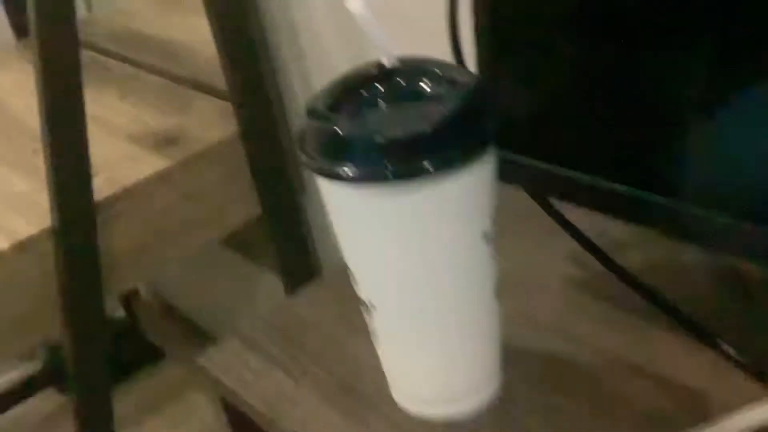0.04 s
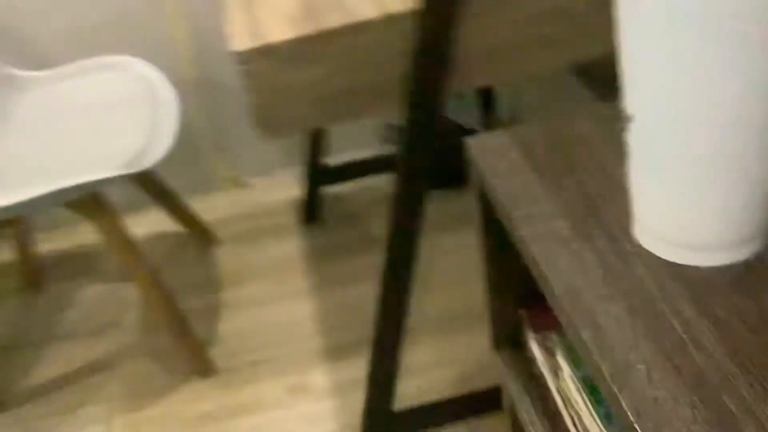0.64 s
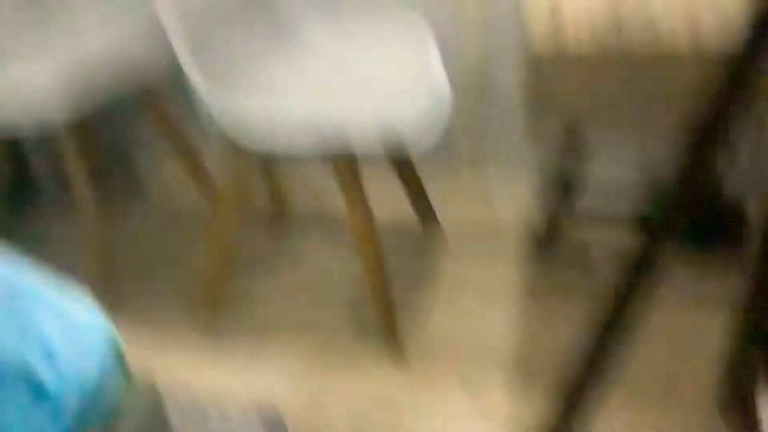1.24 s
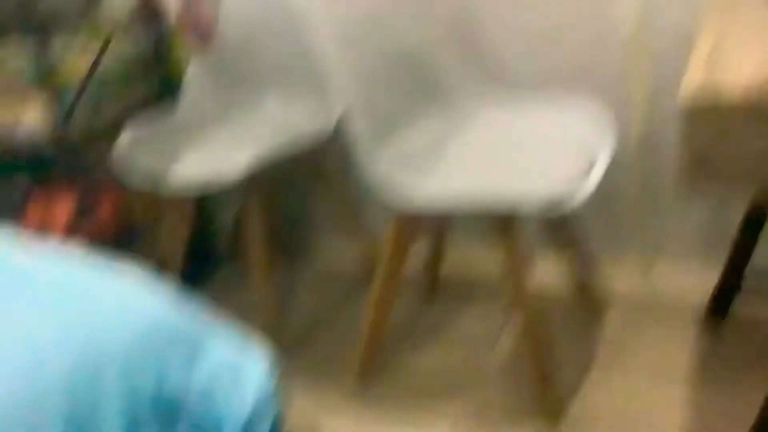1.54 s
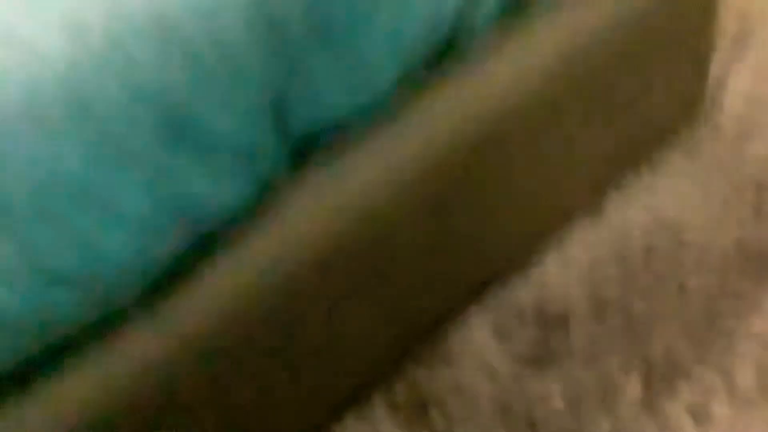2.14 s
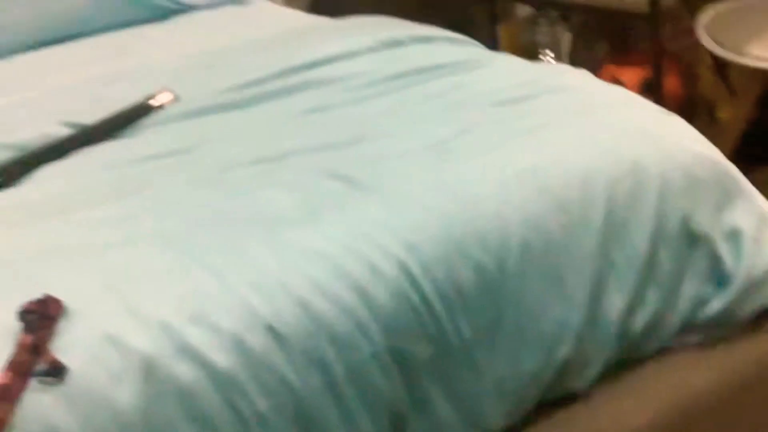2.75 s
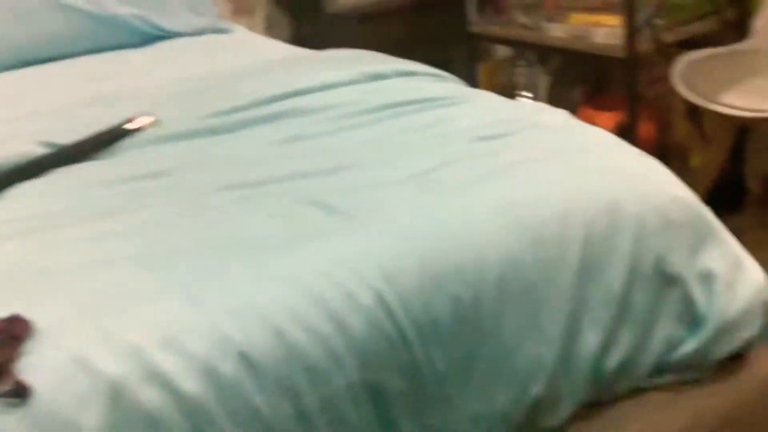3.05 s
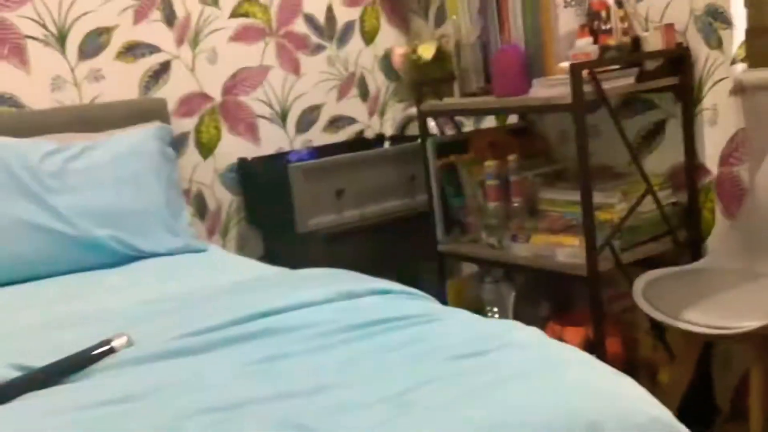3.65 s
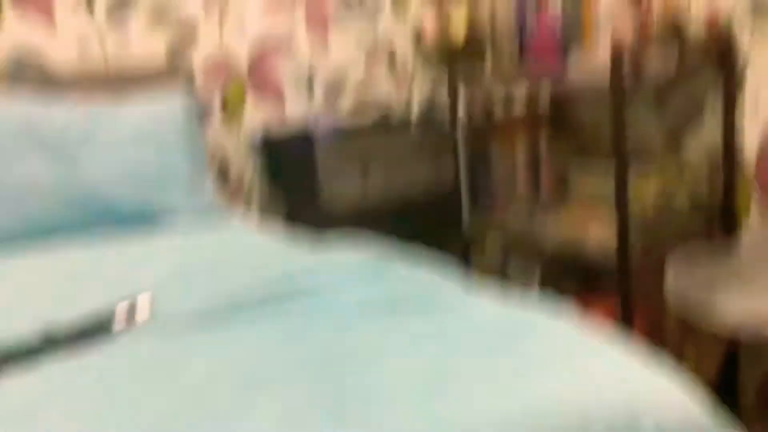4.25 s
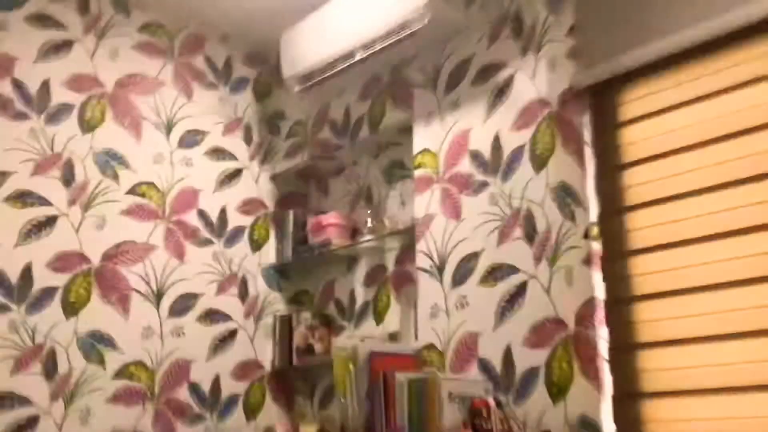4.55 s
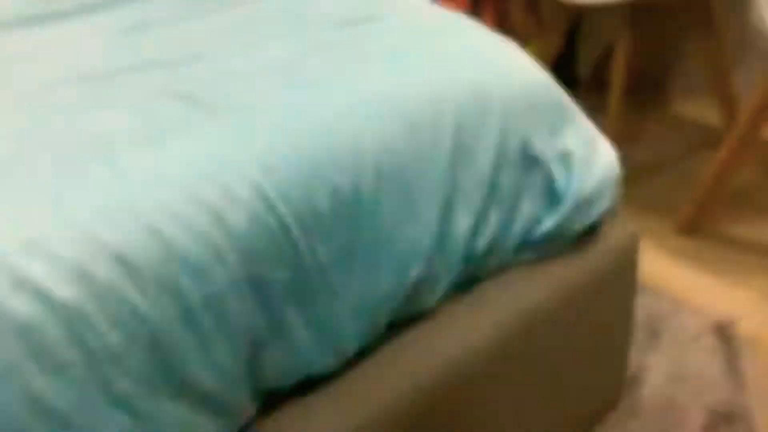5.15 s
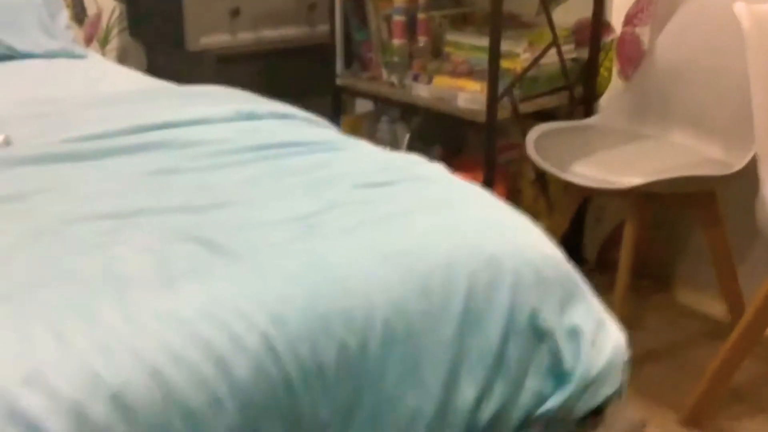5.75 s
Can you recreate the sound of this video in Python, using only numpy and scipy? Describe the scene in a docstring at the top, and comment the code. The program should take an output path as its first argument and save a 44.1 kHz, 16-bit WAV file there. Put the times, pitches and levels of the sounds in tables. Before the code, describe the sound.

Fingers tap, thump and rub on a phone right at its microphone as it is carried around a small, quiet bedroom.

```python
"""Fingers tap, knock and shift on a phone's case, heard from right on top of its own microphone
as it is carried and swung about a small, quiet bedroom. Each contact is a click that falls into a
thump, as the bass travels late through the case; a few free blows leave it ringing.
Between contacts the hand slides in swelling strokes, and the skin squeaks now and then.
Farther off, the furnished room answers the knocks faintly."""
import sys
import numpy as np
from scipy import signal
from scipy.fft import rfft, irfft, next_fast_len
from scipy.io import wavfile
from scipy.ndimage import uniform_filter1d, map_coordinates

SR = 44100
rng = np.random.default_rng(int(sys.argv[2]) if len(sys.argv) > 2 else 0)


def transcribe(signal):
    """Save signal, clipped to [-1, 1], as a 16-bit WAV file at the path in sys.argv[1]."""
    frames = np.atleast_2d(signal).T
    limited = np.clip(frames, -1, 1)
    pcm = np.round(limited * 32767).astype(np.int16)
    wavfile.write(sys.argv[1], SR, pcm)


N = 260569

# The bedroom's decay. Each row: frequency in Hz, seconds to fall 60 dB.
ROOM_DECAY = [(100, 0.18), (400, 0.23), (2200, 0.29), (6000, 0.3), (15000, 0.069)]
# Colours of the room's answer and of the chafing case. Each row: frequency in Hz, gain in dB.
ROOM_COLOUR = [(100, -11.5), (400, -11.5), (2200, -19.0), (5000, -17.5), (15000, -15.0)]
CHAFE_COLOUR = [(2500, -20.0), (5000, 13.5), (15000, -8.5)]
# Colours of the rubbing, and of the case under a contact. Each row: frequency in Hz, gain in dB.
RUMBLE_COLOUR = [(20, -67.5), (45, -19.5), (85, -1.5), (130, -3.5), (280, -5.5), (550, -9), (800, -15.5),
                 (1500, -53.5)]
SCRAPE_COLOUR = [(300, -41), (520, -3.5), (700, -3.5), (1100, -6), (1800, -6.5), (2200, -12.5),
                 (3200, -63.5)]
HISS_COLOUR = [(3000, -10), (4300, 3), (5200, -0.5), (6500, -9), (8000, -2), (16000, -3.5)]
CASE_COLOUR = [(20, -53.5), (38, -39), (55, -8), (75, 0.5), (260, 0), (1600, -1.5), (2200, 2), (2800, 2),
               (4000, 0), (7000, -4), (8400, 0), (10300, -5.5), (12200, -3), (16000, -7)]
# Each hold of the hand tunes the case. Each row: start in seconds, rasp centre, rasp width, upper edge
# and hiss peak in Hz, then gains of the hiss peak, the top hiss and the contacts' tick in dB.
GRIPS = [(0, 2385, 324, 3960, 8950, 1.5, -32.5, 4.5), (.52, 2440, 610, 4940, 9200, 0, -9.5, 1.5),
         (1.0, 2260, 560, 3800, 8700, -1, -0.5, -7.5), (1.3, 2200, 925, 4450, 8640, 6.5, 0, -4.5),
         (1.95, 2500, 1110, 3570, 7740, -8, -9.5, -3), (2.28, 2300, 880, 3940, 11200, -31, -4, 2.5),
         (3.05, 3000, 1500, 3420, 9000, -19, -12.5, 2), (3.6, 3100, 940, 4050, 8340, -25, -9, 13),
         (4.25, 2300, 900, 3320, 6850, 0.5, -3, -4.5), (4.54, 2300, 450, 2480, 6500, -9, -1, 1.5)]
# Short pitched sounds: three skin squeaks, then one brief low knock on the case.
# Each row: start and length in seconds, first and last pitch in Hz, level in dB.
PITCHED_SOUNDS = [(1.968, 0.041, 235, 630, -32.5), (2.129, 0.034, 263, 340, -34),
                  (4.375, 0.025, 485, 440, -23.5), (4.58, 0.0086, 412, 355, -12)]
# Slides of the hand. Each row: start and length in seconds, rasp level in dB, then rumble, scrape
# and hiss in dB relative to the rasp, all ahead of the trims in rubbing().
STROKES = [(0.175, 0.1, -37.5, -12, -3.5, -27), (0.407, 0.082, -36, -20, -8.5, -27),
           (0.542, 0.23, -50.5, -13, -3.5, -9.5), (0.99, 0.15, -47, 1, -3, -7),
           (1.225, 0.19, -43, 4, -5, -17), (1.463, 0.2, -35.5, -4.5, -13.5, -17.5),
           (1.63, 0.22, -40, -0.5, -6.5, -20.5), (1.955, 0.18, -40.5, -1, -17, -9.5),
           (2.113, 0.11, -36, -9, -4, -23.5), (2.261, 0.44, -55, -22, -25, -2),
           (2.986, 0.05, -61, 10, 3, 10), (3.127, 0.24, -43, 5.5, 3.5, -12),
           (3.487, 0.09, -50, 6.5, -11, -10.5), (3.662, 0.13, -52, 5.5, -2, -7.5),
           (3.813, 0.14, -42, -12, -5.5, -11), (4.291, 0.12, -47.5, 11.5, 1, 4.5),
           (4.374, 0.12, -43, 12, 6.5, 2.5), (4.759, 0.094, -47.5, 5, 3, -13),
           (5.044, 0.19, -50, 16.5, 8, -0.5), (5.252, 0.17, -51, 8, 5, 0.5),
           (5.796, 0.18, -59, -3, 4.5, 1.5)]
# Fine hiss under the resting hand. Each row: time in seconds, relative level in dB.
CREEP_HISS = [(0.0, -58), (0.31, -68), (1.61, -58), (2.5, -59.5), (2.78, -94), (3.78, -58.5), (4.08, -69.5),
              (4.32, -82), (4.42, -54), (4.85, -70), (5.26, -59), (5.49, -84), (5.73, -82.5), (5.9, -71)]
# Resonances of the case. Each row: frequency in Hz, gain in dB, seconds to fall 60 dB.
CASE_MODES = [(116, -9, 0.17), (274.6, -3.5, 0.19), (304, 1.5, 0.082), (385, -9, 0.12), (2213, 7.5, 0.013),
              (3570, -17, 0.016)]
# Blows that set the case ringing. Each row: start in seconds, drive of low and of high modes in dB.
FREE_BLOWS = [(1.068, -25.5, 0), (1.084, -18, -40), (1.242, -24.5, -12), (3.123, -32.5, -37),
              (3.512, -24, -53)]
# Registers of a contact in Hz: thump, knock, clack, tap, tick, fizz.
REGISTERS_HZ = [105, 340, 950, 2150, 5000, 11500]
# Fingers on the case. Each row: start in seconds, scuff length in ms, then strength, weight, hardness
# and fizz in dB. Weight (the thump) and fizz are relative to strength; hardness tips clack towards tap.
CONTACTS = [(0.0311, 3, 8.5, -5, -2.5, -31.5), (0.073, 5.7, 6.5, -11, 0, -28.5),
            (0.351, 3.5, 0, -11, 2, -30.5), (0.521, 7.3, -1.5, -25, -0.5, -22),
            (0.549, 4.3, -1, -22, -1.5, -33), (0.663, 4.5, 0.5, -12, 0, -31.5),
            (0.773, 5.7, -4, -8, -1.5, -43), (0.885, 8.5, 0.5, 13.5, 1.5, -21.5),
            (0.983, 2.1, 0, 14.5, -1.5, -45), (1.0661, 7.9, 21, 13.5, -1.5, -25.5),
            (1.087, 7.6, 4.5, 8.5, -5, -8.5), (1.133, 7.1, 1.5, 20, -7, -23),
            (1.2374, 4.05, 21.5, -1, 2, -33.5), (1.31, 6, -6.5, 8.5, 6, -1.5),
            (1.3324, 5.3, 11, 21.5, -9, -15), (1.343, 7.1, 0.5, 25, 10.5, 3.5),
            (1.353, 2.5, 2, 23.5, -3.5, -23.5), (1.391, 3.5, 7, 9, 7.5, -28.5),
            (1.587, 3.2, 10.5, 23.5, 7, -19), (1.607, 39, 2.5, 25, 0.5, -35), (1.63, 13, -8, 34.5, -5, -29),
            (1.7677, 6.7, 18, 8.5, 0.5, -20), (1.922, 4.1, 7, 12, -3, -19), (2.059, 6.8, 3.5, 11, 2, -37),
            (2.1095, 4.2, 15.5, 1.5, 2, -36.5), (2.287, 6.4, 24, 11, -1, -25),
            (2.578, 8, -11.5, 9, 1.5, -17), (2.799, 7.2, -6, -1, 0.5, -35),
            (3.1232, 0.92, 7.5, 7.5, 3, -49), (3.183, 4.9, 11.5, -2, -6, -33),
            (3.5115, 3.3, 5.5, 16.5, -2.5, -35), (3.617, 3.8, -9.5, 15, -8.5, -26),
            (4.243, 7, -13, 5, 5.5, -10.5), (4.396, 10.3, 11, 12, -3.5, -38.5),
            (4.412, 6.7, 4, 26.5, 4, -27), (4.448, 11, 9.5, 21.5, -3.5, -6.5),
            (4.513, 3.9, -7, 22, -3, -13), (4.5647, 2.5, 25.5, 3, -2, -41), (4.5825, 6, 11, 19, -6, -14),
            (4.776, 21, 9, 1, -7.5, -33), (4.795, 7.7, 8.5, -9, 1, -34), (4.858, 9.2, 5, -14, 0, -30),
            (4.91, 9.2, -2, 2, 6.5, -23), (5.019, 6.5, 9, 4, 2.5, -26.5), (5.036, 5.7, 20, 8, 1.5, -16.5),
            (5.071, 12, 14, 3, 1, -15.5), (5.1045, 7, 26, 9, -5, -23), (5.113, 6.5, 30, -1.5, -2.5, -40.5),
            (5.1891, 2.6, 3, -4, -1.5, 9.5), (5.298, 5.4, 0, 17, -2, 0.5), (5.346, 7.8, 20, 23, 2.5, -18),
            (5.352, 15.6, 9, 35, 4, -6), (5.364, 6.4, 12.5, 9.5, -0.5, -10), (5.867, 7.2, -6, 15, -3.5, -9)]


def amp(db):
    """Decibels to gain."""
    return 10 ** (np.asarray(db) / 20)


def unit(x):
    """Scale to rms 1."""
    return x / np.sqrt(np.mean(x ** 2) + 1e-20)


def along(points, hz):
    """Read (Hz, value) points on a log axis."""
    frequencies, values = np.transpose(points)
    return np.interp(np.log(hz + 1), np.log(frequencies + 1), values)


def wobble(per_s):
    """A smooth random curve with per_s knots a second."""
    knots = rng.standard_normal(int(N * per_s / SR) + 4)
    return map_coordinates(knots, [np.arange(N) * per_s / SR])


def filtered(x, response):
    """Pass x through a complex response, given as a function of Hz."""
    size = next_fast_len(N + SR // 2)
    return irfft(rfft(x, size) * response(np.fft.rfftfreq(size, 1 / SR)), size)[:N]


def coloured(x, colour):
    """Shape x by a curve of (Hz, dB) points."""
    return filtered(x, lambda hz: amp(along(colour, hz)))


def causal(gain):
    """The minimum-phase response that has this gain."""
    cepstrum = irfft(np.log(np.maximum(gain, 1e-6)))
    half = len(cepstrum) // 2
    cepstrum[1:half] *= 2
    cepstrum[half + 1:] = 0
    return np.exp(rfft(cepstrum))


def add(track, start_s, sound):
    """Mix a sound in at start_s."""
    start = max(0, round(start_s * SR))
    track[start:start + len(sound)] += sound[:max(0, N - start)]


def ripple(hz, depth_db, step_hz):
    """The many weak, close modes of hand and case: a random unevenness of gain."""
    return amp(depth_db * map_coordinates(rng.standard_normal(1024), [hz / step_hz], mode="mirror"))


def bedroom(knocks, delay_s):
    """The furnished room sends a short, soft tail back to the microphone, weak in the treble."""
    hz, t, noise = signal.stft(rng.standard_normal(SR // 2), SR, nperseg=256)
    decay = amp(-60 * t / along(ROOM_DECAY, hz)[:, None])
    tail = signal.istft(noise * decay, SR, nperseg=256)[1]
    tail = np.pad(tail / np.linalg.norm(tail), (round(delay_s * SR), 0))
    return coloured(signal.fftconvolve(knocks, tail)[:N], ROOM_COLOUR)


def chafing(handling, gain_db, below_hz):
    """The deepest thumps make the case buzz against the hand at each swing."""
    swing = filtered(handling, lambda hz: 1 / (1 + (hz / below_hz) ** 4))
    chafe = unit(coloured(rng.standard_normal(N), CHAFE_COLOUR))
    return amp(gain_db) * swing ** 2 * chafe


def squeaks_and_knock(jitter=0.04, overtone_db=-15):
    """Short gliding tones: three are skin slipping at a near-regular rate, the briefest a low knock."""
    track = np.zeros(N)
    for start_s, length_s, first_hz, last_hz, db in PITCHED_SOUNDS:
        age = np.linspace(0, 1, int(length_s * SR))
        glide_hz = first_hz * (last_hz / first_hz) ** age
        pitch_hz = glide_hz * (1 + jitter * wobble(per_s=220)[:len(age)])
        phase = 2 * np.pi * np.cumsum(pitch_hz) / SR
        tone = np.sin(phase) + amp(overtone_db) * np.sin(2 * phase)
        add(track, start_s, amp(db) * np.sin(np.pi * age) * tone)
    return track


def friction(grain_db, grains_per_s):
    """Skin catching and slipping: noise of rms 1 in short uneven grains."""
    return unit(rng.standard_normal(N) * amp(grain_db * wobble(grains_per_s)))


def gripped(slips, gain, ripple_db, step_hz, size=16384):
    """Each hold of the hand colours the slips anew, at about the same level."""
    hz, t = np.fft.rfftfreq(size, 1 / SR), np.arange(N) / SR
    hold = np.searchsorted([grip[0] for grip in GRIPS[1:]], t)
    track = np.zeros(N)
    for k, (_, *tuning) in enumerate(GRIPS):
        colour = gain(hz, *tuning) * ripple(hz, ripple_db, step_hz)
        response = irfft(causal(colour))[:size // 8]
        crossfade = uniform_filter1d((hold == k) * 1., size=600)
        track += crossfade * signal.oaconvolve(slips, response / np.linalg.norm(response))[:N]
    return track


def resonance(hz, centre_hz, width_hz):
    """Gain of one resonance, 1 at its centre."""
    return np.abs(hz * width_hz / (centre_hz ** 2 - hz ** 2 + 1j * hz * width_hz))


def scrape_gain(hz, *tuning):
    """The broad middle of a rub."""
    return amp(along(SCRAPE_COLOUR, hz))


def rasp_gain(hz, rasp_hz, width_hz, edge_hz, *treble):
    """One resonance of the case, falling away steeply above its edge and in the bass."""
    high_cut = 1 + (hz / edge_hz) ** 10
    low_cut = 1 + (1650 / (hz + 1)) ** 7
    return resonance(hz, rasp_hz, width_hz) / high_cut / low_cut


def hiss_gain(hz, rasp_hz, width_hz, edge_hz, peak_hz, peak_db, top_db, tick_db):
    """Fine hiss with one airy peak from the gap between hand and microphone port."""
    slope_db = along([(7000, 0.0012), (12000, top_db)], hz)
    peak = resonance(hz, peak_hz, 0.16 * peak_hz) ** 2
    return amp(along(HISS_COLOUR, hz) + slope_db) + amp(peak_db) * peak


def swished(hiss, delay_ms, sway, echo):
    """A reflection off the moving hand draws slowly sliding resonances through the hiss."""
    lag = delay_ms * SR / 1000 * np.exp(sway * wobble(per_s=2.5))
    return unit(hiss + echo * map_coordinates(hiss, [np.arange(N) - lag]))


def slide_levels(steepness=4.37, uneven_db=1.8, tremor_db=1.17, creep_db=(-48, -59.5, -61, -1.5)):
    """Rumble, scrape, rasp and hiss in dB: strokes swell and fade over the resting hand's creep."""
    t, power = np.arange(N) / SR, np.zeros((4, N))
    for start_s, length_s, rasp_db, rumble_db, scrape_db, hiss_db in STROKES:
        speed = 1 / (1 + np.abs(2 * (t - start_s) / length_s - 1) ** steepness)
        gains = amp(rasp_db + np.array([rumble_db, scrape_db, 0, hiss_db]))
        power += np.outer(gains ** 2, speed ** 2)
    sliding = np.sqrt(power) * amp(uneven_db * wobble(per_s=15))  # a slide's speed is never even
    resting = np.outer(amp(creep_db), amp(tremor_db * wobble(per_s=9)))
    resting[3] *= amp(np.interp(t, *np.transpose(CREEP_HISS)))
    return 20 * np.log10(np.hypot(sliding, resting))


def rubbing():
    """The hand slides right beside the microphone: it rumbles, scrapes, rasps and hisses."""
    rumble_db, scrape_db, rasp_db, hiss_db = slide_levels()
    rumble = unit(coloured(friction(grain_db=3.0, grains_per_s=71), RUMBLE_COLOUR))
    scrape = gripped(friction(grain_db=0.5, grains_per_s=110), scrape_gain, ripple_db=4.5, step_hz=136.6)
    rasp = gripped(friction(grain_db=2.5, grains_per_s=490), rasp_gain, ripple_db=0, step_hz=166)
    hiss = gripped(friction(grain_db=2.0, grains_per_s=310), hiss_gain, ripple_db=3, step_hz=614)
    hiss = swished(hiss, delay_ms=0.803, sway=0.22, echo=0.18)
    return (amp(rumble_db - 4.0) * rumble + amp(scrape_db - 3.0) * scrape
            + amp(rasp_db - 4.5) * rasp + amp(hiss_db - 2.0) * hiss)


def case_ringing(attack_s, detune):
    """The case rings on after a few free blows, a little retuned each time by the hand."""
    track, t = np.zeros(N), np.arange(SR // 4) / SR
    rise = (1 - np.exp(-t / attack_s)) ** 2
    for start_s, low_db, high_db in FREE_BLOWS:
        for hz, db, t60 in CASE_MODES:
            strength_db = db + along([(400, low_db), (2000, high_db)], hz) + rng.normal()
            swing = np.sin(2 * np.pi * hz * (1 + detune * rng.normal()) * t)
            add(track, start_s, amp(strength_db - 60 * t / t60) * swing * rise)
    return track


def through_case(x, cycles, corner_hz):
    """Slow bending waves: each frequency reaches the microphone about as many of its own cycles late."""
    return filtered(x, lambda hz: np.exp(-2j * np.pi * cycles * np.log1p(hz / corner_hz)))


def light_touches(count, scuff_ms=6.5, strength_db=-13.5, spread_db=3.5):
    """The fingers adjust their hold with soft touches at loose intervals: rows as in CONTACTS."""
    weight_db, hardness_db, fizz_db = 22, -2.5, -31.5
    return [((k + place) * N / SR / count, scuff_ms, strength_db + spread_db * (2 * force - 1),
             weight_db, hardness_db, fizz_db) for k, (place, force) in enumerate(rng.random((count, 2)))]


def contact_colour(start_s, strength_db, weight_db, hardness_db, fizz_db):
    """A heavy finger thumps and knocks, a hard one taps, dry skin ticks and fizzes: (Hz, dB) points."""
    _, _, _, edge_hz, *_, grip_tick_db = [grip for grip in GRIPS if grip[0] <= start_s][-1]
    knock_db = -1 + 0.46 * weight_db - 0.51 * hardness_db
    tick_db = -11 + 0.37 * fizz_db + grip_tick_db
    levels = strength_db + np.array([weight_db, knock_db, -hardness_db, hardness_db, tick_db, fizz_db])
    tap, tick = levels[3:5]
    cliff = [(edge_hz, (tap + tick) / 2), (1.12 * edge_hz, tick)]  # the hand damps all above the edge
    return sorted([*zip(REGISTERS_HZ, levels), *cliff])


def finger_contacts(scuff_cycles, fade_db, spiky_db, ripple_db, thump_db, treble_db, size=8192):
    """Each contact is one clean push in the bass and a short scuff of tiny slips in the treble."""
    track, t, hz = np.zeros(N), np.arange(size) / SR, np.fft.rfftfreq(size, 1 / SR)
    case_db = along(CASE_COLOUR, hz) + along([(105, thump_db), (11500, treble_db)], hz)
    lead = size // 32  # keeps the filter's brief pre-ring, so a contact starts without a sharp edge
    for start_s, scuff_ms, *touch in CONTACTS + light_touches(count=22):
        slips, sizes = rng.standard_normal((2, size))
        scuff_s = scuff_ms / 1000 if scuff_ms > 1 else 0.001
        age = t / scuff_s
        catches = unit(uniform_filter1d(sizes, size=24))  # skin catches in clumps, a few much harder
        scuff = rfft(slips * amp(spiky_db * catches - fade_db * age) * (1 - np.exp(-5 * age)))
        power = np.abs(uniform_filter1d(np.abs(scuff) ** 2, size=200))
        scuff /= np.sqrt(power + 1e-12)  # even force at all pitches
        scuff_share = 1 - 1 / (1 + (hz * scuff_s / scuff_cycles) ** 2) ** 2  # slow waves feel one push
        force = np.sqrt(1 - scuff_share) + np.sqrt(scuff_share) * scuff
        colour = amp(along(contact_colour(start_s, *touch), hz) + case_db)
        colour *= ripple(hz, ripple_db * scuff_share, step_hz=404)  # each spot favours other high modes
        contact = irfft(force * causal(colour))
        add(track, start_s, np.roll(contact, lead)[:size // 2])
    return np.pad(track[lead:], (0, lead))


def scene():
    """Contacts and rubbing travel through the case to one microphone, with the room faint behind."""
    taps = finger_contacts(scuff_cycles=8, fade_db=16, spiky_db=5, ripple_db=3,
                           thump_db=-2, treble_db=-4.5)
    knocks = taps + case_ringing(attack_s=0.001, detune=0.023)
    handling = through_case(knocks + rubbing() + squeaks_and_knock(), cycles=2.032, corner_hz=30)
    buzz = chafing(handling, gain_db=-9.5, below_hz=350)
    return (handling + buzz + bedroom(knocks, delay_s=0.008))[None]


def record(dry, top_hz=16100):
    """The phone rounds off the highest peaks and keeps nothing above its band limit."""
    rounded = dry[0] / (1 + np.abs(dry[0]) ** 6) ** (1 / 6)
    return filtered(rounded, lambda hz: hz < top_hz)[None]


dry = scene()
out = record(dry)
transcribe(out)
```